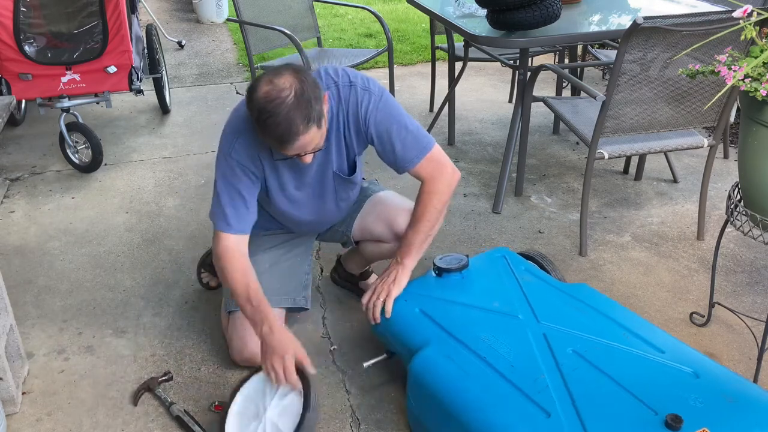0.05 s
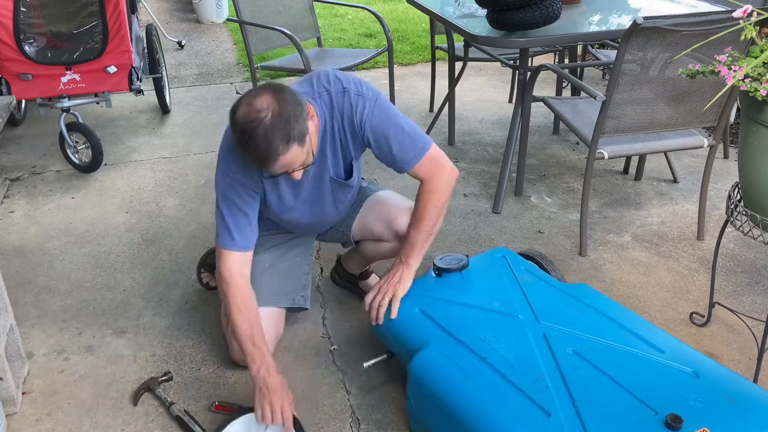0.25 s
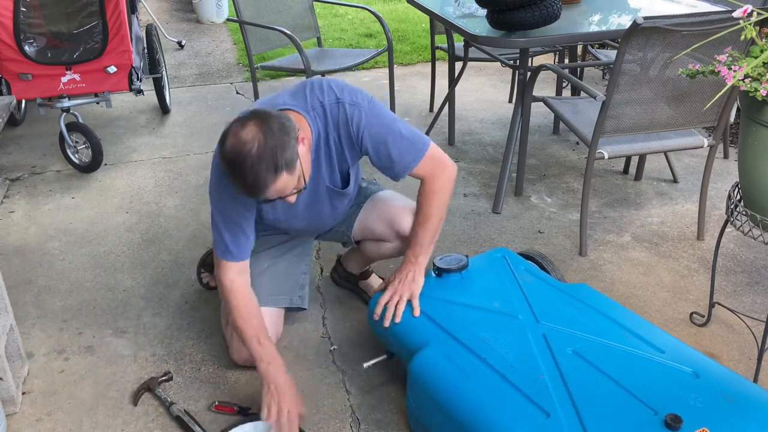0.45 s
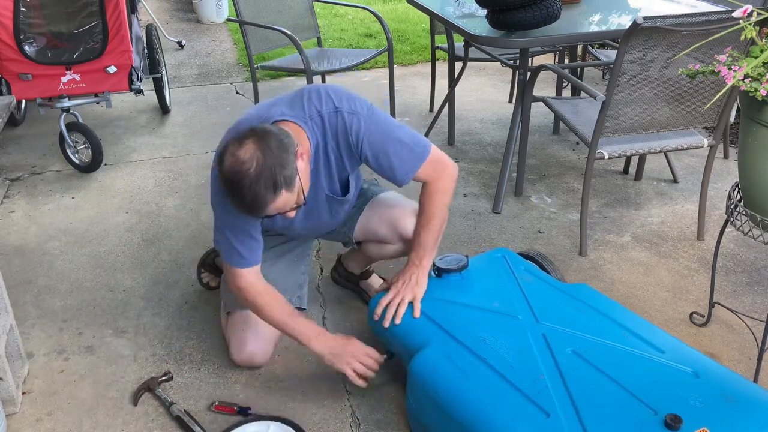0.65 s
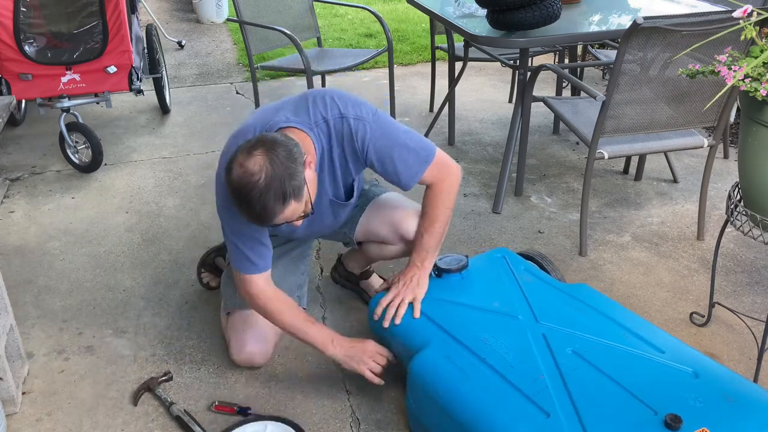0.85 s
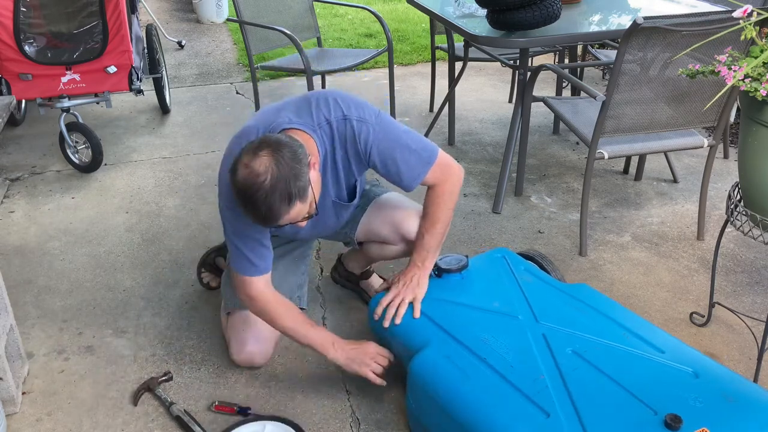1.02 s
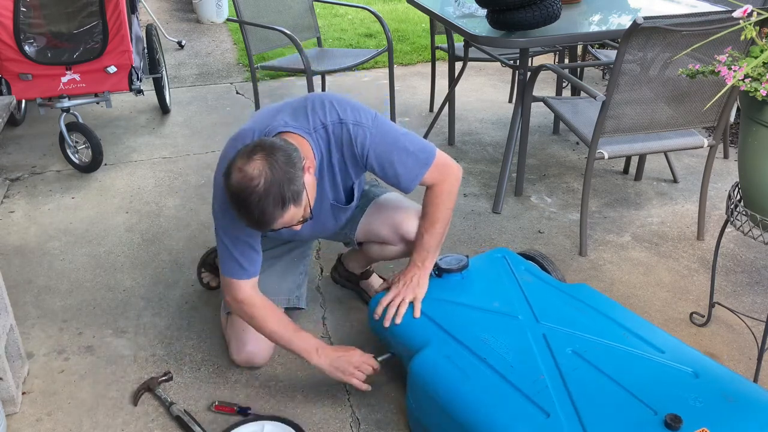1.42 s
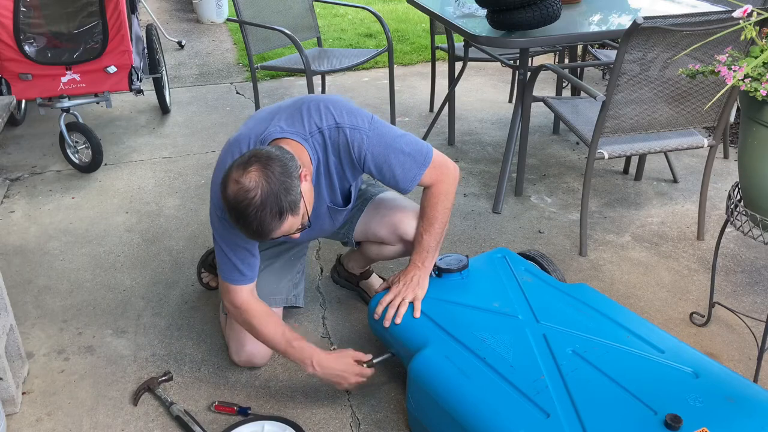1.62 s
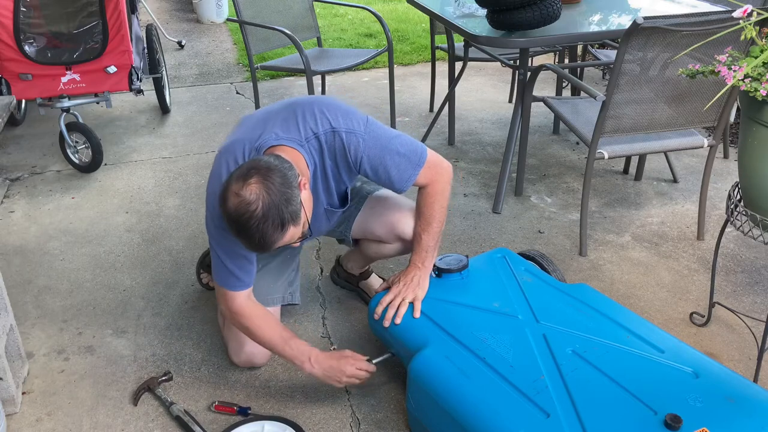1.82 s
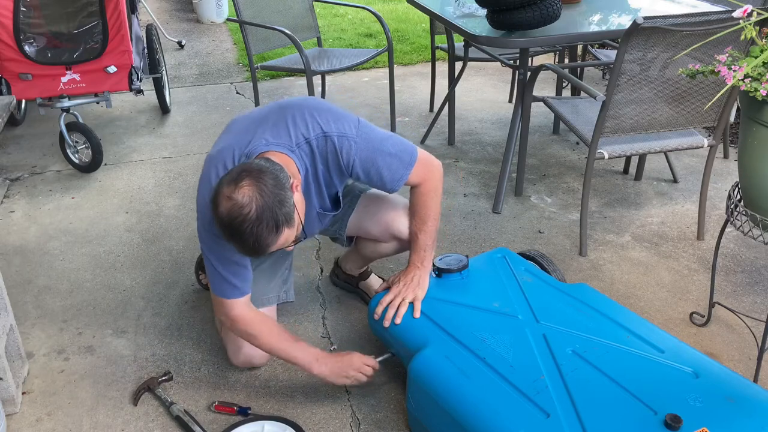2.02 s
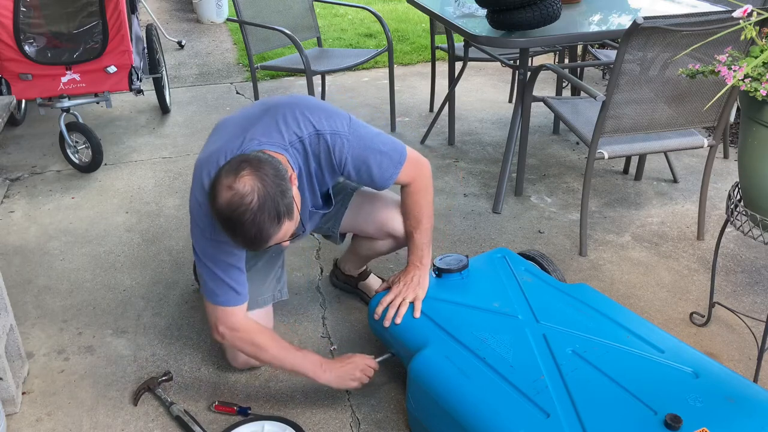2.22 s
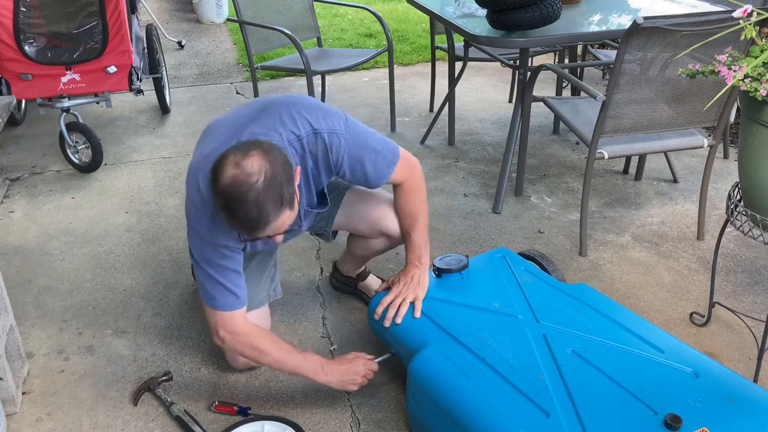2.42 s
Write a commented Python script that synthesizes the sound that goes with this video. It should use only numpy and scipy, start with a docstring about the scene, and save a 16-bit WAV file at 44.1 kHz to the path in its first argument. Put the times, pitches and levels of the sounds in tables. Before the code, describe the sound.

A plastic wheel clatters down on concrete, then faint hollow bumps and scuffs.

```python
"""A plastic wheel settling on concrete

A wheel lands on its tread, tips on the gritty patio and rocks flat with a quick clatter, each impact
exciting its damped modes. A hand then works a steel axle rod in a hollow plastic tank, which resonates
to faint scuffs and bumps amid soft rustles. House walls reflect the wheel's knocks, and a distant
machine hums under the quiet outdoor air."""
import sys
import numpy as np
from scipy import signal
from scipy.fft import rfft, irfft, next_fast_len
from scipy.io import wavfile
from scipy.ndimage import map_coordinates

SR = 44100
rng = np.random.default_rng(int(sys.argv[2]) if len(sys.argv) > 2 else 0)


def dump_mix(stems):
    """Bounce the given channels to the path in sys.argv[1] as a 16-bit WAV at rate SR."""
    frames = np.atleast_2d(stems).T  # one column per channel
    limited = np.clip(frames, -1, 1)  # hard clip at full scale
    pcm = np.round(limited * 32767).astype(np.int16)
    wavfile.write(sys.argv[1], SR, pcm)


N = 112454

# Background spectra: f/Hz, relative level/dB
HUM_PARTIALS = [(57.3, -4.5), (114.5, -18.5), (165, -19.5)]
RUMBLE_SPECTRUM = [(20, -24), (36, 3), (50, 8), (70, 3), (92, 14.5), (125, 9), (180, 2), (260, -15.5),
                   (400, -48.5)]
AIR_SPECTRUM = [(120, -11), (200, 6), (360, -4.5), (600, -8.5), (930, -9.5), (1600, -17.5), (2200, -17.5),
                (4350, -25.5), (6000, -36), (9200, -49.5), (11500, -43.5), (16000, -81.5)]
# Background envelopes: t/s, relative level/dB
HUM_ENVELOPE = [(0.0, -46), (0.16, -42.5), (0.33, -57.5), (0.43, -49), (0.62, -43), (0.69, -61),
                (0.81, -42.5), (1.11, -47), (1.37, -42), (1.49, -55), (1.65, -42), (1.91, -49.5),
                (1.99, -42), (2.24, -46.5), (2.27, -58), (2.36, -41.5), (2.43, -42.5), (2.55, -59)]
RUMBLE_ENVELOPE = [(0.0, -45), (0.4, -48), (0.6, -42.5), (0.62, -49), (0.98, -47), (1.51, -50), (1.55, -44),
                   (2.43, -48), (2.55, -45)]
# Likeness of noise in the two channels: f/Hz, coherence
COHERENCE = [(60, 0.93), (130, 0.97), (290, 0.78), (640, 0.098), (1400, 0.053), (7000, 0.051)]

# Sliding hiss and grit crunch, with the microphone's comb colouring in the top treble:
# f/Hz, relative level/dB
COMBED_HISS = [(500, -11), (1500, 8.5), (3000, 2.5), (4500, 2), (5600, -11), (6700, -2.5), (7700, 1),
               (8500, -9), (9200, -31), (10200, -3), (12000, -9.5), (13600, -21), (15300, -13)]
COMBED_GRIT = [(300, -25), (1200, 14.5), (2500, 5.5), (4200, -3), (5400, -7.5), (6600, -1.5), (7700, -0.5),
               (8500, -6), (9200, -30), (10300, -11), (12000, -12.5), (13600, -45.5), (15500, -15)]

# Tread dragging, hand and cloth brushing: t/s, attack/s, hold/s, release/s, level/dB
RUSTLE_STROKES = [(0.196, 0.0064, 0.097, 0.29, -55), (0.376, 0.0067, 0.23, 0.11, -59.5),
                  (0.73, 0.0092, 0.0083, .05, -74.5), (1.056, 0.058, 0.099, .05, -67),
                  (1.513, 0.0055, 0.05, .04, -61.5), (1.746, 0.026, .015, .08, -68.5)]
# Rod rubbing in the tank: t/s, attack/s, hold/s, release/s, boom/dB, rub/dB, scratch/dB
ROD_STROKES = [(1.191, 0.018, 0.022, 0.047, -48, -60, -52), (1.509, 0.036, 0.035, 0.051, -38.5, -65, -46.5),
               (1.673, 0.022, .015, 0.076, -50, -60.5, -61.5),
               (1.767, 0.015, 0.031, 0.051, -44, -62, -55.5), (2.027, 0.17, 0.082, 0.035, -50, -49, -80),
               (2.328, 0.002, 0.12, 0.089, -47.5, -54.5, -74.5), (2.53, .015, .02, .05, -54.5, -74.5, -67)]
# Rod striking the tank wall: t/s, relative level/dB
ROD_BUMPS = [(1.222, -34), (1.5345, -28), (1.5585, -27.5), (1.808, -38), (2.342, -40.5)]
# Tank resonances: f/Hz, level/dB, T60/s
TANK_MODES = [(168, 1.5, 0.243), (243.1, -4, 0.297), (311.8, -15, 0.27), (491, -13.5, 0.23),
              (780, -17, 0.12), (944, -21.5, 0.12), (1129, -21, .09)]
# Spectra of the rod's rub, scratch and bump: f/Hz, relative level/dB
RUB_SPECTRUM = [(100, -32.5), (260, 7), (330, 8), (500, -10), (680, 3), (1000, -45), (1600, -32.5),
                (4000, -47.5)]
SCRATCH_SPECTRUM = [(150, -25), (450, 6), (900, 3), (1500, -8), (2500, -9.5), (3500, -23), (4500, -26.5),
                    (6000, -42), (14000, -41)]
BUMP_SPECTRUM = [(120, 0), (250, -3.5), (500, -5), (900, 0.5), (2000, -12)]

# Wall reflections: delay/s, left level/dB, right level/dB
WALL_ECHOES = [(.0068, -23.5, -15.5), (.0142, -13, -14), (.0315, -23.5, -15.5), (.0515, -31, -32.5)]
# Decay of the open-air tail: f/Hz, T60/s
PATIO_DECAY = [(150, .28), (600, .3), (2000, .28), (6000, .2), (14000, .11)]

# Spectra of hub rattle and the wheel's contact force: f/Hz, relative level/dB
RATTLE_SPECTRUM = [(1200, -25), (1900, -9), (2550, 0), (3000, -8.5), (3700, -16), (4300, -16),
                   (6000, -42.5)]
FORCE_SPECTRUM = [(60, -39), (160, -11), (300, -5), (500, 5), (1000, 1), (1500, -2), (2500, -13),
                  (4000, -9.5), (8000, -13), (16000, -30)]
# Wheel resonances: f/Hz, level struck on the tread/dB, level struck on the rim/dB, T60/s
WHEEL_MODES = [(317, -15, -44, 0.24), (394, -13, -20, 0.035), (420.6, -7, -6.5, 0.22),
               (564.5, -12.5, -10, 0.099), (592.8, -4.5, -1, 0.14), (655.5, -4.5, -7.5, 0.21),
               (737.6, -6.5, -8, 0.1), (834.6, -8.5, -13, .12), (874.7, -5, -7.5, 0.085),
               (944, -1.5, -2.5, 0.067), (1022, -14.5, -8.5, 0.12), (1157, -2.5, -14, 0.058),
               (1525, -10.5, -15.5, .08), (1756, -14.5, -11, 0.075)]
# Tread impacts: t/s, level/dB, extra bass/dB, extra treble/dB, spot f/Hz, spot flex/dB, grit/dB
TREAD_IMPACTS = [(.2128, -6.5, 5, 3, 386, 11, -26), (.2638, -24.5, -0.5, -4.5, 420, 4, -62),
                 (.4110, -3, 1, -2, 700, 4.5, -28.5), (.4583, -19.5, 2.5, 13.5, 490, 17.5, -43),
                 (.4868, -22, 6, -4.5, 480, -11, -55), (.5312, -12, 7, 3.5, 405, -4, -29),
                 (.5680, -29.5, -3.5, 3, 595, 12.5, -42.5), (.6098, -4, 2.5, -2.5, 1220, 8, -31),
                 (.6400, -27.5, -12, -11.5, 570, 9, -59.5)]
# Rim impacts: the same columns, then free ringing/s
RIM_IMPACTS = [(.3960, 0, -7.5, -2.5, 835, 6.5, -43.5, 0.016), (.5038, -2.5, -2, -10, 1040, -7, -51, .02),
               (0.5777, -4, -4, -18, 711, 8.5, -51, 0.013)]
# Level difference of the wheel, which lies to the left: f/Hz, left minus right/dB
LEFT_EXCESS = [(150, -1.5), (380, 1.6), (700, 5), (1300, 3.5), (2400, 8), (8000, -3)]


def amp(db):
    """Amplitude ratio of a level in decibels."""
    return 10 ** (np.asarray(db) / 20)


def unit(x):
    """Normalisation to unit rms."""
    return x / np.sqrt(np.mean(x ** 2) + 1e-20)


def along(points, hz):
    """Interpolation on a logarithmic frequency axis."""
    f, v = np.transpose(points)
    return np.interp(np.log(hz + 1), np.log(f + 1), v)


def clock():
    """Sampling instants in seconds."""
    return np.arange(N) / SR


def wobble(rate):
    """Spline interpolation of random values, `rate` a second."""
    return map_coordinates(rng.standard_normal(int(N * rate / SR) + 4), [clock() * rate])


def filtered(x, response):
    """Linear filtering by a complex frequency response."""
    size = next_fast_len(N + SR // 2)
    return irfft(rfft(x, size) * response(np.fft.rfftfreq(size, 1 / SR)), size)[..., :N]


def causal(x, curve_db, size=4096):
    """Minimum-phase filtering: nothing precedes the attack."""
    cepstrum = irfft(np.log(amp(curve_db(np.fft.rfftfreq(size, 1 / SR)))))
    cepstrum[1:size // 2] *= 2
    cepstrum[size // 2 + 1:] = 0
    return signal.fftconvolve(x, irfft(np.exp(rfft(cepstrum))))[:len(x)]


def noise(spectrum):
    """Partially coherent stereo noise of unit rms, alike in the bass."""
    def response(hz):
        angle = np.arccos(np.clip(along(COHERENCE, hz), -1, 1)) / 2
        return amp(along(spectrum, hz)) * [np.cos(angle), np.sin(angle)]
    mid, side = filtered(rng.standard_normal((2, N)), response)
    return unit(np.array([mid + side, mid - side]))


def fade(t, t60):
    """Exponential decay from t = 0, by 60 dB in t60."""
    return (t >= 0) * np.exp(-np.log(1000) * np.abs(t) / t60)


def ring(modes, t):
    """Free vibration as a superposition of damped modes."""
    return sum(amp(db) * fade(t, t60) * np.sin(2 * np.pi * hz * t) for hz, db, t60 in modes)


def stroke(start, attack, hold, release):
    """Linear rise, hold, then exponential decay of 20 dB per release time."""
    t = clock() - start
    return np.clip(t / attack, 0, 1) * 10 ** (-np.maximum(t - attack - hold, 0) / release)


def outdoors(wander_rad=0.77, hum_gain_db=0.5):
    """Phase and amplitude modulation make a machine's hum waver over rumble and faint air."""
    t = clock()
    hum = unit(sum(amp(db) * np.sin(2 * np.pi * hz * t + wander_rad * wobble(4.91))
                   for hz, db in HUM_PARTIALS))
    hum *= amp(hum_gain_db + np.interp(t, *np.transpose(HUM_ENVELOPE)))
    rumble = amp(np.interp(t, *np.transpose(RUMBLE_ENVELOPE))) * noise(RUMBLE_SPECTRUM)
    air = amp(-57) * noise(AIR_SPECTRUM)
    return hum + rumble + air


def rustles():
    """Sliding friction of tread, hand and cloth radiates a grainy hiss."""
    envelope = sum(amp(db) * stroke(*shape) for *shape, db in RUSTLE_STROKES)
    return envelope * unit(noise(COMBED_HISS) * amp(1.1 * wobble(250)))


def tread_squeak(peak_s=0.354, half_width_s=0.0085, hz=5060, sag_hz_per_s=3000, flutter_db=4):
    """Friction draws one tiny falling tone from the tread as it tips."""
    t = clock() - peak_s
    envelope = np.exp(-(t / half_width_s) ** 2) * amp(-59 + flutter_db * wobble(150))
    return envelope * np.sin(2 * np.pi * (hz - sag_hz_per_s * t / 2) * t)


def axle_scuffs(roughness_db=1.5, slips_per_s=180):
    """Stick-slip friction of the rod rubs, scratches and drives the tank's resonances."""
    slips = unit(amp(roughness_db * wobble(slips_per_s)))
    boom, rub, scratch = sum(amp(row[4:])[:, None] * stroke(*row[:4]) for row in ROD_STROKES) * slips
    tank = ring(TANK_MODES, clock()[:SR // 2])
    drive = boom * noise([(100, 0.0036), (1000, 0.0048)])  # practically white
    hollow = signal.fftconvolve(drive, tank[None] / np.linalg.norm(tank), axes=1)[:, :N]
    return hollow + rub * noise(RUB_SPECTRUM) + scratch * noise(SCRATCH_SPECTRUM)


def axle_bumps():
    """Impulse excitation: soft blows of the rod set the tank ringing."""
    blows = np.zeros(N)
    for start, db in ROD_BUMPS:
        blows[round(start * SR)] = amp(db) / 2
    hollow = causal(ring(TANK_MODES, clock()[:SR // 3]), lambda hz: along(BUMP_SPECTRUM, hz))
    return signal.fftconvolve(blows, hollow)[:N]


def patio(x, tail_db=-20.5, scatter_db=-6, scatter_t60_s=.06):
    """Reflection from walls, scattering from nearby furniture and weak reverberation."""
    echoes = filtered(x, lambda hz: sum(amp([[left], [right]]) * np.exp(-2j * np.pi * hz * delay)
                                        for delay, left, right in WALL_ECHOES))
    hz, t, bands = signal.stft(rng.standard_normal((2, SR // 2)), SR, nperseg=256)
    tail = signal.istft(bands * fade(t, along(PATIO_DECAY, hz)[:, None]), SR, nperseg=256)[1]
    t = np.arange(tail.shape[1]) / SR
    scatter = rng.standard_normal(tail.shape) * fade(t - .004, scatter_t60_s)
    response = amp(tail_db) * tail / np.linalg.norm(tail[0])
    response += amp(scatter_db) * scatter / np.linalg.norm(scatter[0])
    return echoes + signal.fftconvolve(x, response, axes=1)[:, :N]


def hub_rattle(relative_db=-40.5):
    """Contact chatter: the loose hub buzzes briefly after each rim impact."""
    envelope = sum(amp(db + relative_db) * stroke(start, attack=.01, hold=.004, release=.012)
                   for start, db, *_ in RIM_IMPACTS)
    return envelope * unit(noise(RATTLE_SPECTRUM) * amp(3 * wobble(700)))


def grit(attack_s=0.00074, t60_s=.022, tail_db=-13, tail_t60_s=0.1, grain_db=3.5, grains_per_s=1800):
    """Granular noise: sand crunches under each contact, with a two-stage decay."""
    envelope = np.zeros(N)
    for start, *_, db in TREAD_IMPACTS + [hit[:-1] for hit in RIM_IMPACTS]:
        t = clock() - start
        decay = fade(t, t60_s) + amp(tail_db) * fade(t, tail_t60_s)
        envelope += amp(db) * decay * np.clip(t / attack_s, 0, 1)
    return envelope * unit(noise(COMBED_GRIT) * amp(grain_db * wobble(grains_per_s)))


def knock(modes, start, db, bass_db, treble_db, spot_hz, flex_db, flex_t60_s=0.017, spread_db=0.7):
    """An impact excites the modes and flexes the struck spot; contact hardness shapes the spectrum."""
    t = clock()[:SR // 5]
    struck = [(hz, level + spread_db * rng.standard_normal(), t60) for hz, level, t60 in modes]
    body = ring(struck + [(spot_hz, flex_db, flex_t60_s)], t)
    body /= np.abs(body).max()
    hardness = [(341.5, bass_db), (605, 0), (952, 0), (1740, treble_db)]  # f/Hz, level/dB
    impact = causal(body, lambda hz: along(FORCE_SPECTRUM, hz) + along(hardness, hz))
    out = np.zeros(N)
    out[round(start * SR):][:len(t)] = amp(db) * impact
    return out


def wheel(tread_t60_s=.075, flat_s=.642, flat_t60_s=0.045, bend_delay_s=0.00283, bend_hz=750):
    """Modal ringing of dull tread landings and hollow rim clacks, damped as the wheel lies flat."""
    def damping(start, t60):
        return fade(np.maximum(clock() - start, 0), t60)
    tread_modes = [(hz, db, t60) for hz, db, _, t60 in WHEEL_MODES]
    rim_modes = [(hz, db, t60) for hz, _, db, t60 in WHEEL_MODES]
    landings = sum(knock(tread_modes, *hit) for *hit, _ in TREAD_IMPACTS)
    # The rim rings freely until the tread touches again.
    clacks = sum(knock(rim_modes, start, *hit) * damping(start + free_s, tread_t60_s)
                 for start, *hit, _, free_s in RIM_IMPACTS)
    clatter = (landings + clacks) * damping(flat_s, flat_t60_s)
    # Bending waves are dispersive: the bass arrives later.
    clatter = filtered(
        clatter, lambda hz: np.exp(-2j * np.pi * bend_delay_s * bend_hz * np.arctan(hz / bend_hz)))
    sides, left_lead_s = np.array([[.5], [-.5]]), .00006
    return filtered(clatter, lambda hz: amp(sides * along(LEFT_EXCESS, hz))
                    * np.exp(2j * np.pi * hz * sides * left_lead_s))


def scene():
    """Superposition of the clatter, its reflections, the handling and the background."""
    clatter = wheel() + hub_rattle() + grit()
    return clatter + patio(clatter) + rustles() + tread_squeak() + axle_scuffs() + axle_bumps() + outdoors()


def record(dry):
    """Band limiting: an ideal low-pass filter cuts off at 15.9 kHz."""
    return filtered(dry, lambda hz: hz < 15900)


dry = scene()
out = record(dry)
dump_mix(out)
```